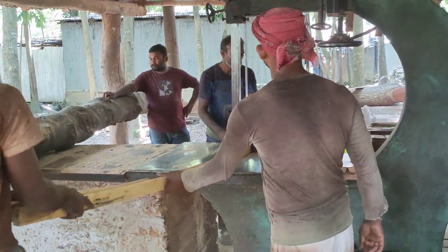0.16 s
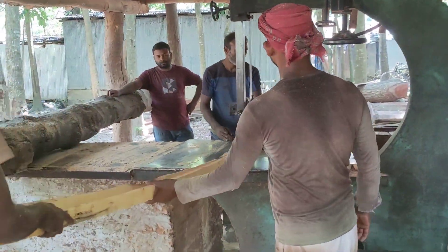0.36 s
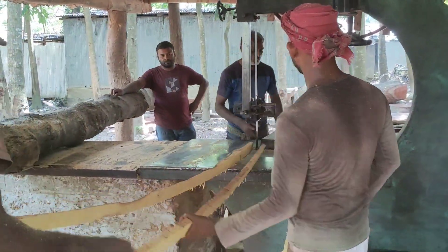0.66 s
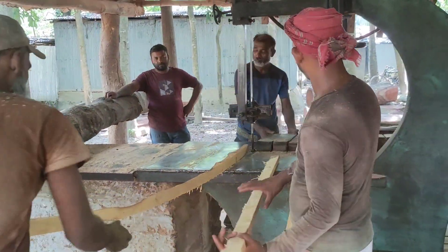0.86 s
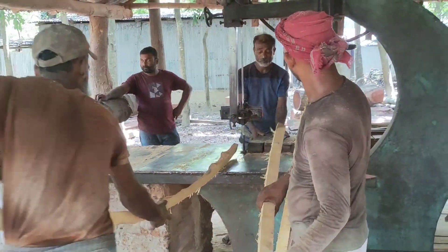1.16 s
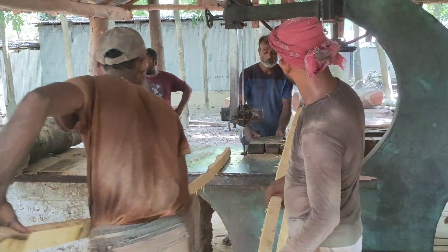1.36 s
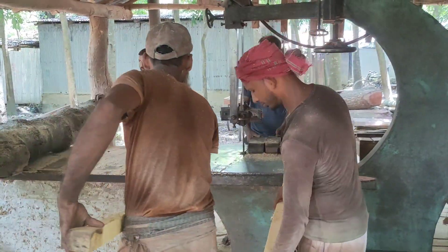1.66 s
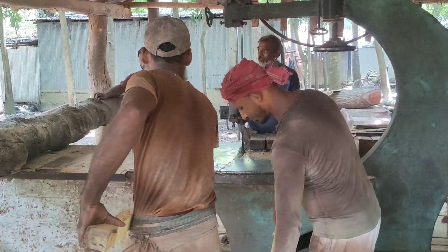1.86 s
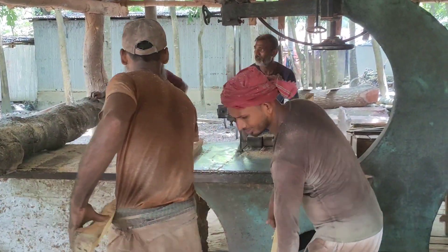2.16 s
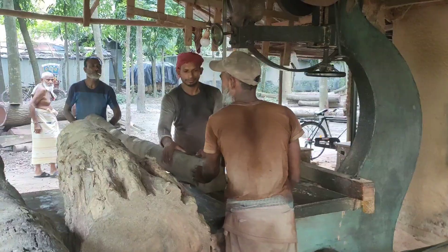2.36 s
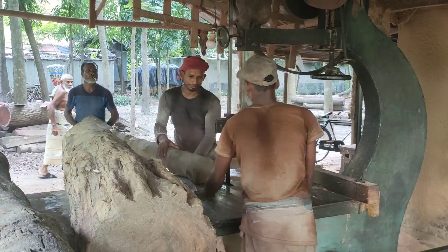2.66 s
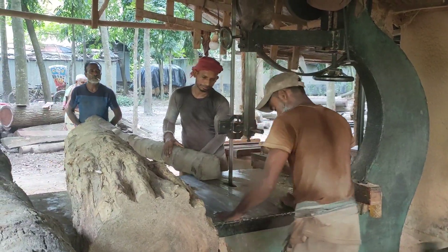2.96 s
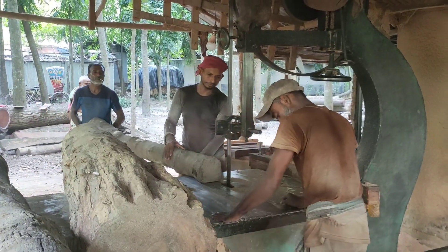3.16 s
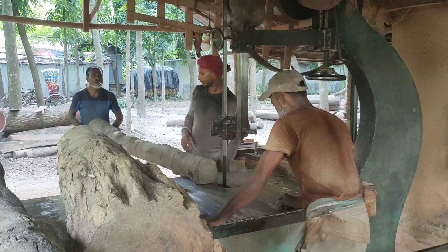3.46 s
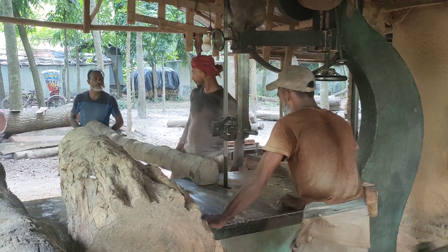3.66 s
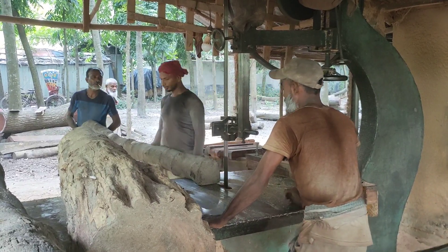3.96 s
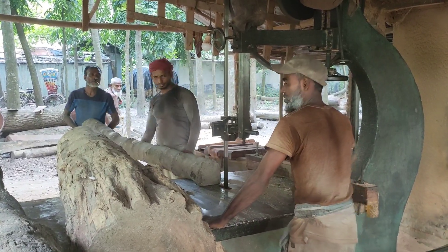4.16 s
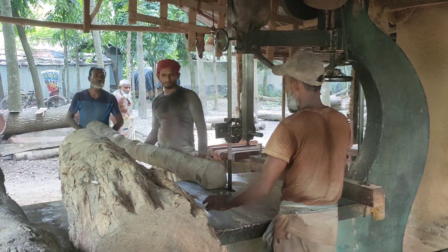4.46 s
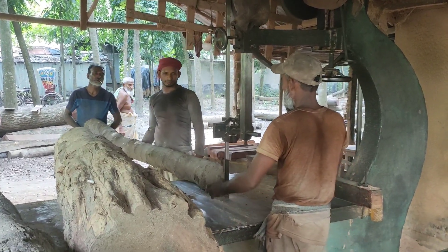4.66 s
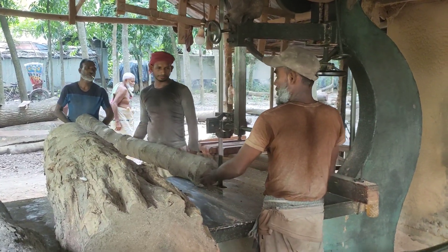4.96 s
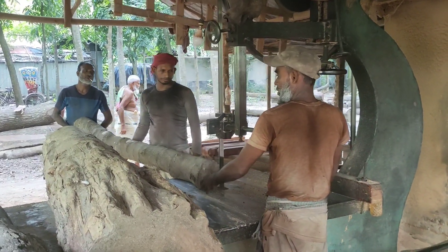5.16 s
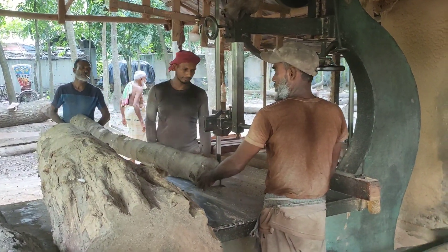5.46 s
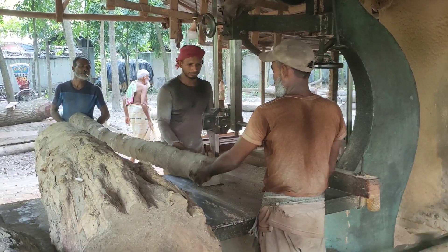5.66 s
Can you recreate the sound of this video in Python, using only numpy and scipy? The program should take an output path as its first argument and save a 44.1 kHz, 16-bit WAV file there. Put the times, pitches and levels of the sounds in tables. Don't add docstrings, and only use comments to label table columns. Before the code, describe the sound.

A big band saw runs in an open shed: low rumble, clanging table, ringing blade and a faint six-per-second throb. Teeth hiss into wood at the start, then planks knock and slap. At about 1.9 seconds everything cuts to silence, returning near 2.5 seconds louder, with a brief squeal, log knocks and rasping bites. Close microphone, wide, diffuse stereo.

```python
import sys
import numpy as np
from scipy import signal
from scipy.fft import rfft, irfft, next_fast_len
from scipy.io import wavfile
from scipy.ndimage import uniform_filter1d

SR = 44100
rng = np.random.default_rng(int(sys.argv[2]) if len(sys.argv) > 2 else 0)


def generate_wav(signal):
    frames = np.transpose(np.atleast_2d(signal))
    scaled = np.clip(frames, -1, 1) * 32767
    pcm = np.round(scaled).astype(np.int16)
    wavfile.write(sys.argv[1], SR, pcm)


def nominal_scale(level):
    x = np.asarray(level, float) / 20
    return 10 ** x


N = 256220
TIME = np.arange(N) / SR
SIZE = next_fast_len(N + SR)
HZ = np.arange(SIZE // 2 + 1) * SR / SIZE
STOP_S, RESUME_S, FADE_S = 1.9215, 2.519, 0.048
FIRST = TIME < (STOP_S + RESUME_S) / 2

# pitch_hz, level_db
FRAME_COLOUR = [(120, -46.5), (155, -24), (200, -7), (300, 0), (410, -4.5), (490, 2.5), (540, -3.5),
                (640, -35)]
TABLE_COLOUR = [(510, -48), (580, -1.5), (700, -2.5), (950, 0), (1150, -2.5), (1250, -5), (1500, -3),
                (1900, -1), (2300, -37)]
BLADE_COLOUR = [(1500, -32.5), (1950, -24), (2050, 0), (2500, -3), (3300, -7.5), (3900, -10.5),
                (5100, -10.5), (6500, -17), (7900, -18), (8500, -28), (15700, -43)]
HISS_COLOUR = [(3500, -17), (6000, -8), (6600, -3.5), (7100, 1.5), (8000, -6.5), (8300, -12.5),
               (9800, -14.5), (10100, -5), (11500, -6.5), (12700, -6.5), (13100, -2.5), (15000, -10),
               (15400, -8), (16000, -8)]
SINGING_COLOUR = [(4300, -25), (4800, -5.5), (5150, -14), (5450, 2.5), (5900, -2), (6500, -5),
                  (7500, -15.5)]
RUMBLE_COLOUR = [(20, -3.5), (40, 1), (65, 0.5), (81, 4.5), (100, -5.5), (118, -23), (170, -22)]
# pitch_hz, width_hz, level_db
FRAME_TONES = [
    [(204, 30, 4), (338, 18, 4), (451, 18, 3)],
    [(213, 50, 1), (366, 26, 8), (451, 14, 8)],
]
TABLE_TONES = [
    [(665, 30, -1), (795, 22, 2), (864, 26, 5), (1020, 26, 2), (1110, 26, 3), (1314, 20, -3)],
    [(597, 20, 1), (646, 26, 0), (860, 36, 1), (967, 24, 3), (1012, 22, 5), (1097, 24, 4), (1362, 30, -4)],
]
BLADE_TONES = [
    [(2046, 36, 6), (2310, 40, 1), (2425, 36, 1), (2670, 40, -2), (3036, 40, -4), (5620, 250, -11)],
    [(2049, 36, 5), (2088, 30, 4), (2150, 34, 3), (2345, 40, 0), (2605, 40, -2), (2931, 36, -2),
     (3232, 30, -2), (3575, 50, -7), (4860, 32, -9), (5507, 120, -9)],
]
# pitch_hz, shared_part (0-1), left_lead_rad
LIKENESS = [(61, 0.97, 0.16), (129.4, 0.9, -1.1), (291, 1, -0.97), (639, 0.33, -0.48), (1383, 0.16, 1.6),
            (2980, 0.5, 1.47), (16000, 0, 1.3)]
# turns_per_s, start_angle_turns, once_a_turn_db, twice_a_turn_db
WHEEL = [
    (6.2, 0.65, 1, 0.7),
    (6.25, 0.63, 0.9, 0.6),
]
# time_s, loudness_db, weight_db
RUNNING = [
    [(0, -31.5, 0.5), (.45, -32, -0.5), (.9, -33.5, 4), (1.3, -32, 1), (1.92, -32, 3.5)],
    [(2.52, -22.5, -1), (2.85, -22.5, -1), (3.25, -22.5, 1.5), (3.55, -24.5, 1), (3.9, -25.5, 1.5),
     (4.05, -28, 1), (4.5, -27, -2.5), (4.7, -27.5, -2), (4.92, -30, 1.5), (5.1, -29, -0.5),
     (5.2, -28, -4.5), (5.45, -29, -3.5), (5.81, -25.5, -7.5)],
]
# start_s, length_s, start_level_db, end_level_db
BITES = [(-.05, 0.301, 10, 14), (.355, 0.029, 0, 2), (2.45, 0.16, 1, 7.5), (2.68, 0.058, 2, 6.5),
         (2.76, 0.052, 9, 8.5), (2.82, .055, 6.5, 7.5), (3.0, 0.14, 7, 5), (3.19, 0.09, -2, 3.5),
         (3.33, .1, 10.5, 6.5), (3.48, 0.16, 3, 5), (3.645, 0.047, 11.5, 3.5), (3.8, 0.17, 2.5, 3.5),
         (4.02, .06, -1.5, 6.5), (4.12, 0.12, 4, 0), (4.29, 0.1, 4.5, 2.5), (4.52, 0.026, 2, 8),
         (5.088, .11, 15, 11), (5.198, .065, 7, 0), (5.263, .127, 13, 11), (5.39, .29, 12, 10.5),
         (5.68, .2, 4.5, 3)]
# start_s, length_s, start_level_db, end_level_db
HEAVES = [(.1, 0.12, 2, 4.5), (.4, .06, 3, -1.5), (1.15, 0.094, -5, 5.5), (1.24, 0.066, -3, -1.5),
          (2.66, .08, 1.5, -7), (2.86, .1, 1, 0.5), (3.22, .1, 2, 8.5), (3.62, 0.11, 1, 5),
          (4.06, 0.088, -1, -6), (4.14, .12, 4.5, 3.5), (4.4, .04, 5, 6), (4.98, 0.05, -10, 8),
          (5.08, .04, 4, 6), (5.33, 0.081, 9, 9)]
# start_s, length_s, start_level_db, end_level_db
DEEP_CUTS = [(.19, .06, -4, 0.5), (.9, .03, 4.5, 3), (3.0, .125, 1.5, 6), (3.33, .03, 5, 9),
             (3.55, .12, 6, 4), (3.72, .2, 2.5, 6), (5.1, .1, 3, 3), (5.265, .195, 4, 4),
             (5.46, .13, 7.5, 7), (5.59, .1, 6.5, 4), (5.69, .2, 2.5, 1.5)]
# start_s, peak_db, pitch_hz, crack_db
GUARD_KNOCKS = [(.03, -11.5, 2360, -20), (.065, -13, 2450, -16), (0.199, -11, 2320, -3),
                (.62, -13, 2100, -20), (2.603, -10, 2200, -12), (2.63, -10, 1650, -20),
                (0.359, -28, 2080, -12), (0.857, -13, 2140, -8), (1.493, -18.5, 2140, 1),
                (1.69, -10, 2900, -25.5), (2.769, -11, 2240, -12), (2.948, -12, 2290, -17),
                (2.999, -10, 1780, -11), (3.079, -5.5, 2080, -12), (3.659, -15.5, 2200, 8),
                (4.319, -28, 2030, -13), (4.999, -14, 2100, 1), (5.089, -16, 2190, 1),
                (5.116, -19, 2080, -5), (5.339, -18, 2050, -6)]
TABLE_KNOCKS = [(0.498, -15, 880, -4.5), (0.739, -15.5, 880, -20.5), (0.799, -15, 840, -10),
                (0.885, -18, 850, -15), (1.027, -7.5, 970, -22), (.115, -18, 850, -22),
                (1.163, -9.5, 950, -27), (1.339, -16.5, 1100, -7), (1.493, -17, 890, -19),
                (1.68, -12, 1010, -26), (1.809, -22, 864, -4), (3.03, -14, 950, -19),
                (3.169, -6, 1010, -19), (3.234, -6.5, 1080, -3), (3.262, -5, 1000, -25),
                (3.329, -9, 1030, -7.5), (3.589, -15, 1030, -14), (4.129, -12.5, 955, -14),
                (4.219, -12.5, 1000, -1), (4.33, -15.5, 1000, -15), (4.469, -14.5, 975, 3),
                (5.0, -11, 930, -12), (5.339, -16.5, 790, -19), (5.65, -23, 640, -25),
                (4.89, -16, 980, -22), (4.15, -19, 990, -22)]
# pitch_hz, width_hz, level_db
PLANK_TONES = [
    (338, 16, 0),
    (215, 30, -3),
]
# start_s, level_db
PLANK_DROPS = [
    (1.35, -30),
    (5.0, -36),
]
# start_s, peak_db
SLAPS = [
    (1.678, -10),
    (1.69, -15),
    (1.703, -17),
    (4.222, -19),
    (5.003, -21),
]
# start_s, length_s, start_pitch_hz, end_pitch_hz, level_db
WHISTLES = [
    (2.622, .025, 2150, 1550, -18),
    (3.96, .025, 3950, 4200, -27),
    (4.218, .028, 3850, 4080, -24),
    (4.236, .014, 4300, 4750, -27),
    (4.503, .036, 3900, 4100, -28),
    (4.76, .02, 3900, 4000, -31),
    (4.806, .026, 3900, 3850, -28),
]


def add(out, start_s, sound):
    start = int(start_s * SR)
    out[:, start:start + sound.shape[-1]] += sound[..., :N - start]


def on_log_axis(points, column=1):
    columns = np.transpose(points)
    return np.interp(np.log(HZ + 1), np.log(columns[0]), columns[column])


def ring(tones):
    return sum(nominal_scale(db) / (1 + 1.3j * (HZ - hz) / width_hz) ** 2 for hz, width_hz, db in tones)


def through(x, response, lo_hz, hi_hz):
    inside = (HZ > lo_hz) & (HZ < hi_hz)
    power = np.sum(np.abs(response[inside]) ** 2) / len(HZ)
    return irfft(rfft(x, SIZE) * response / np.sqrt(power), SIZE)[..., :N]


def walk(rate):
    hold = int(SR / rate)
    steps = np.repeat(rng.standard_normal(N // hold + 1), hold)
    return 1.3 * uniform_filter1d(uniform_filter1d(steps, hold), hold)[:N]


def contacts(spread_db):
    sizes = nominal_scale(spread_db * rng.exponential(size=N).clip(0, 5))
    left, other = rfft(rng.standard_normal((2, N)) * sizes, SIZE)
    like = np.clip(on_log_axis(LIKENESS), 0, 1)
    lead_rad = on_log_axis(LIKENESS, column=2)
    right = like * np.exp(-1j * lead_rad) * left + np.sqrt(1 - like ** 2) * other
    pair = irfft(np.array([left, right]), SIZE)[:, :N]
    return pair / np.sqrt(np.mean(pair ** 2))


def part(drive_db, colour, tones, lo_hz, hi_hz, spread_db, flicker_db, flicker_rate):
    force = contacts(spread_db) * nominal_scale(drive_db + flicker_db * walk(flicker_rate))
    low_cut = np.minimum(HZ / colour[0][0], 1) ** 4
    broad = nominal_scale(on_log_axis(colour)) * low_cut
    if not tones:
        return through(force, broad, lo_hz, hi_hz)
    first, second = (through(force, np.hypot(broad, np.abs(ring(t))), lo_hz, hi_hz) for t in tones)
    return np.where(FIRST, first, second)


def played(tables):
    first, second = ([np.interp(TIME, rows[0], levels) for levels in rows[1:]] for rows in map(np.transpose, tables))
    return np.where(FIRST, first, second)


def presses(rows, edge_s):
    total = np.zeros(N)
    for start_s, length_s, start_db, end_db in rows:
        during = (TIME >= start_s) & (TIME < start_s + length_s)
        slide = start_db + (end_db - start_db) * (TIME - start_s) / length_s
        total += np.where(during, slide, 0)
    return uniform_filter1d(total, max(int(edge_s * SR), 1))


def throb(place):
    turns_per_s, start, once_db, twice_db = WHEEL[place]
    angle = 2 * np.pi * (turns_per_s * TIME + start)
    return once_db * np.cos(angle) + twice_db * np.cos(2 * angle)


def wheel():
    return np.where(FIRST, throb(place=0), throb(place=1))


def seam(place, tick_db):
    turns_per_s, start = WHEEL[place][:2]
    angle = 2 * np.pi * (turns_per_s * TIME + start)
    return tick_db * np.exp(5.1 * (np.cos(angle) - 1))


def heave():
    return presses(HEAVES, edge_s=.03)


def drive(base_db, loud, weight, bite):
    loud_db, weight_db = played(RUNNING)
    ticks_db = np.where(FIRST, seam(place=0, tick_db=1.5), seam(place=1, tick_db=-0.1))
    bite_db = presses(BITES, edge_s=0.011) + ticks_db
    return base_db + loud * (loud_db + 30) + weight * weight_db + bite * bite_db


def iron_frame():
    push_db = drive(-42, loud=0.77, weight=1.28, bite=0.05) + heave() + .3 * wheel()
    return part(push_db, FRAME_COLOUR, FRAME_TONES, 150, 520, spread_db=2.0, flicker_db=1.5, flicker_rate=27)


def saw_table():
    push_db = drive(-32.5, loud=0.8535, weight=.9, bite=0.1257) + 0.22 * heave() + .4 * wheel()
    return part(push_db, TABLE_COLOUR, TABLE_TONES, 520, 1500, spread_db=3.0, flicker_db=1.5, flicker_rate=30)


def steel_blade():
    push_db = drive(-27.5, loud=0.93, weight=0.26, bite=0.2186) + 0.5 * wheel()
    return part(push_db, BLADE_COLOUR, BLADE_TONES, 1900, 4200, spread_db=2.5, flicker_db=1.26, flicker_rate=45)


def teeth_hiss():
    push_db = drive(-45, loud=0.53, weight=-0.2, bite=1.02) + .3 * wheel()
    return part(push_db, HISS_COLOUR, [], 9000, 15500, spread_db=3.0, flicker_db=0.5, flicker_rate=40)


def blade_singing():
    push_db = drive(-39, loud=0.1, weight=-0.3, bite=0.44) + presses(DEEP_CUTS, edge_s=.03) + 0.27 * wheel()
    return part(push_db, SINGING_COLOUR, [], 5200, 6300, spread_db=3.5, flicker_db=1.1, flicker_rate=50)


def ground_rumble():
    push_db = drive(-63.5, loud=1.3, weight=0.15, bite=-0.03)
    return part(push_db, RUMBLE_COLOUR, [], 15, 120, spread_db=-4.0, flicker_db=2.2, flicker_rate=9)


def saw():
    return iron_frame() + saw_table() + steel_blade() + teeth_hiss() + blade_singing() + ground_rumble()


def blow(age, t60_s, rise_s, shape):
    return (1 - np.exp(-age / rise_s)) * np.exp(-np.log(1000) * (age / t60_s) ** shape)


def resonate(x, hz, width_hz):
    band = signal.iirpeak(hz, hz / width_hz / 1.5, SR)
    twice = signal.lfilter(*band, signal.lfilter(*band, x))
    return twice * np.sqrt(SR / width_hz / np.pi)


def knocks(rows, width_hz, t60_s):
    out, age = np.zeros((2, N)), np.arange(SR // 4) / SR
    for start_s, peak_db, hz, crack_db in rows:
        body, crack = rng.standard_normal((2, 2, len(age))) * blow(age, t60_s, rise_s=0.004, shape=1.49)
        sound = resonate(body, hz, width_hz) + nominal_scale(crack_db) * resonate(crack, 2600, 3600)
        add(out, start_s - .002, nominal_scale(peak_db - 8) * sound)
    return out


def guard_knocks():
    return knocks(GUARD_KNOCKS, width_hz=270, t60_s=0.065)


def table_knocks():
    return knocks(TABLE_KNOCKS, width_hz=270, t60_s=0.094)


def plank_drops():
    out, age = np.zeros((2, N)), np.arange(SR // 4) / SR
    for start_s, level_db in PLANK_DROPS:
        for hz, width_hz, tone_db in PLANK_TONES:
            envelope = blow(age, 4.4 / width_hz, rise_s=.014, shape=1.3)
            add(out, start_s, nominal_scale(level_db + tone_db) * envelope * np.sin(2 * np.pi * hz * age))
    return out


def slaps():
    out, age = np.zeros((2, N)), np.arange(SR // 4) / SR
    soften = signal.butter(4, 5200, fs=SR, output="sos")
    for start_s, peak_db in SLAPS:
        burst = rng.standard_normal((2, len(age))) * blow(age, t60_s=.06, rise_s=.0015, shape=1.1)
        wood = resonate(burst, hz=2500, width_hz=2400)
        add(out, start_s, nominal_scale(peak_db) * signal.sosfilt(soften, wood))
    return out


def whistles():
    out = np.zeros((2, N))
    for start_s, length_s, start_hz, end_hz, level_db in WHISTLES:
        share = np.linspace(0, 1, int(length_s * SR))
        glide_hz = start_hz + (end_hz - start_hz) * share
        tone = np.exp(2j * np.pi * np.cumsum(glide_hz) / SR)
        chance = uniform_filter1d(rng.standard_normal((2, 2, 4000)), size=60)[..., :len(share)] * np.sqrt(60)
        flutter = .8 + .6 * (chance[0] + 1j * chance[1])
        swell = np.sqrt(np.sin(np.pi * share).clip(0))
        add(out, start_s, nominal_scale(level_db) * swell * (tone * flutter).imag)
    return out


def scene():
    balance = nominal_scale(np.array([[.2], [-.2]]))
    return (saw() + guard_knocks() + table_knocks() + plank_drops() + slaps() + whistles()) * balance


def roll_off(x):
    return signal.sosfilt(signal.butter(12, 15760, fs=SR, output="sos"), x)


def record(dry):
    fade = np.sin(np.pi / 2 * np.clip(1 + (TIME - RESUME_S) / FADE_S, 0, 1)) ** 4
    gated = dry * np.where(TIME < STOP_S, 1, fade)
    top_cut = signal.ellip(10, .2, 70, 15780, fs=SR, output="sos")
    mix = signal.sosfilt(top_cut, gated)
    return roll_off(mix)


dry = scene()
out = record(dry)
generate_wav(out)
```